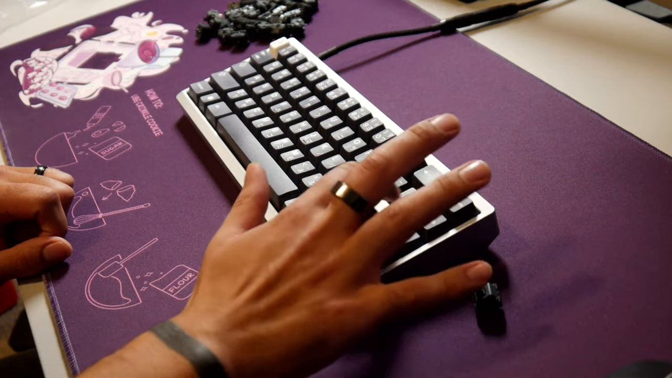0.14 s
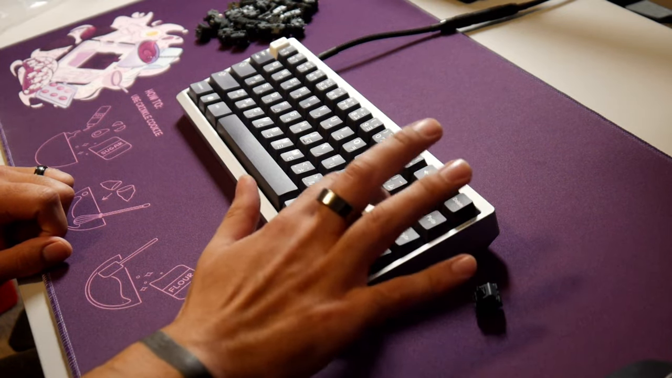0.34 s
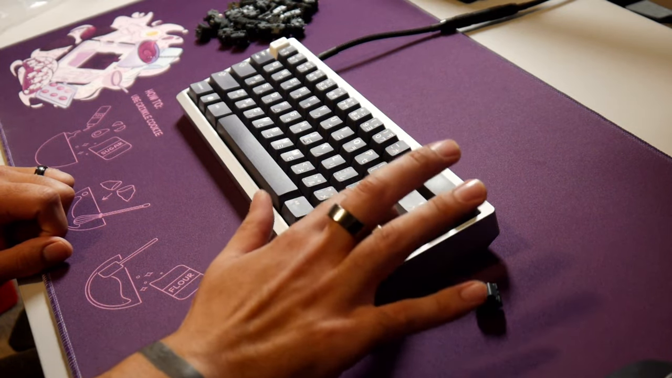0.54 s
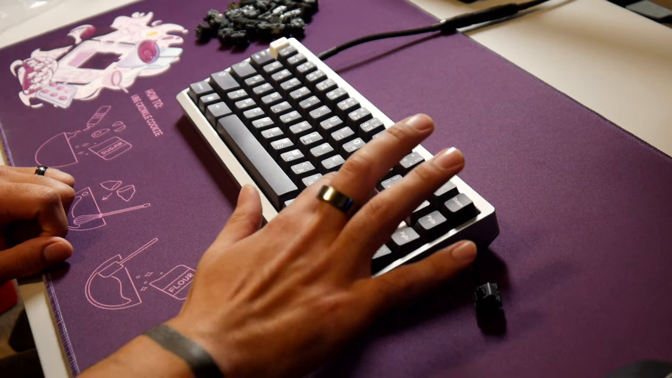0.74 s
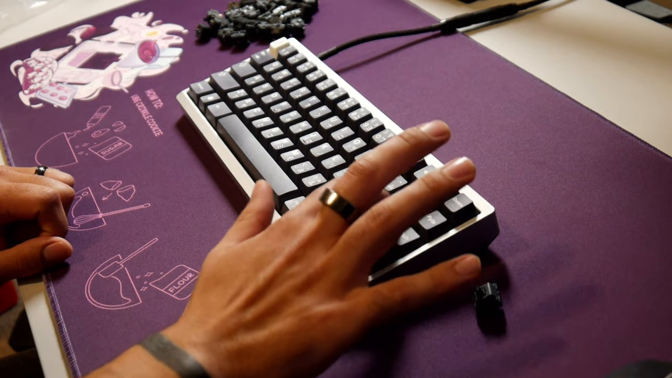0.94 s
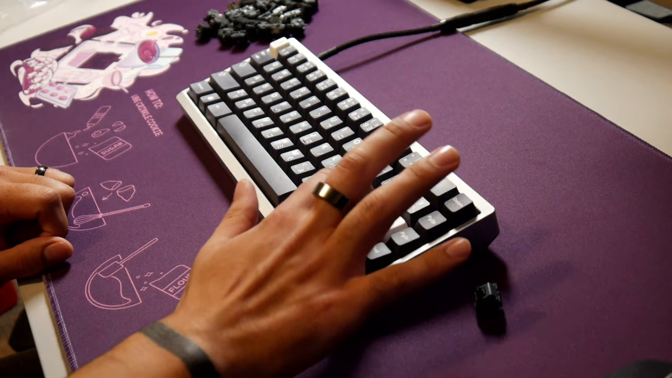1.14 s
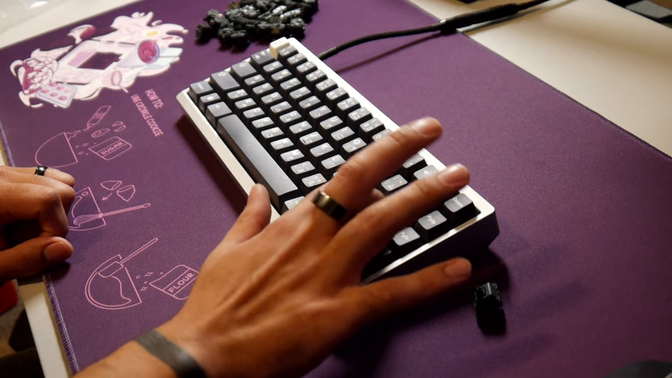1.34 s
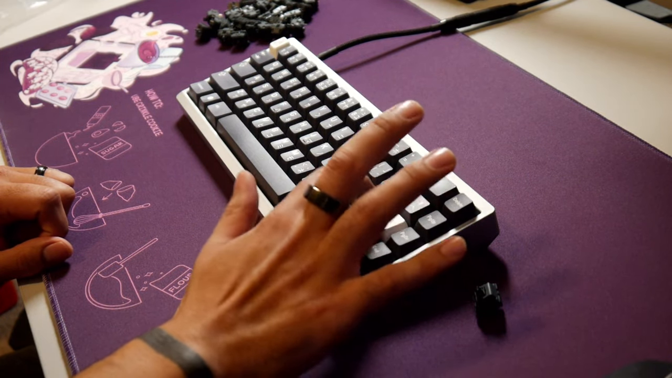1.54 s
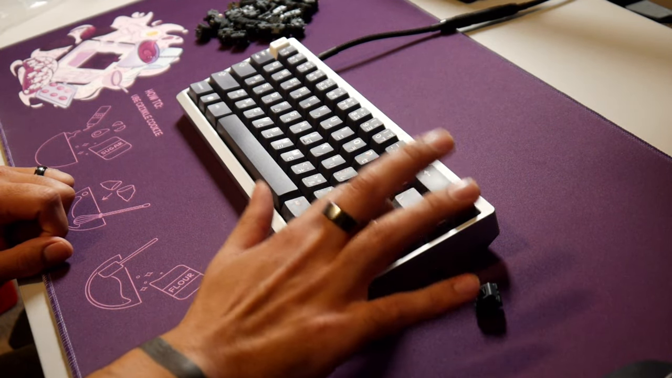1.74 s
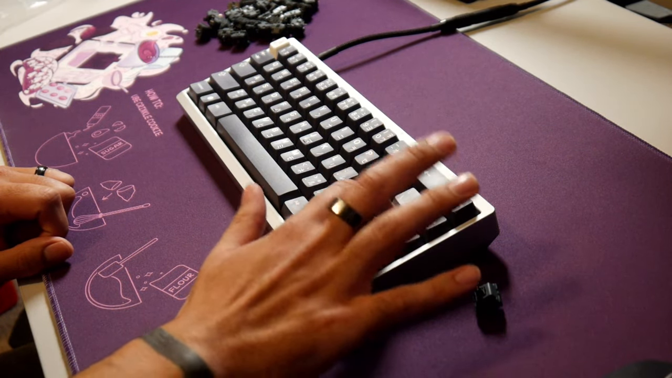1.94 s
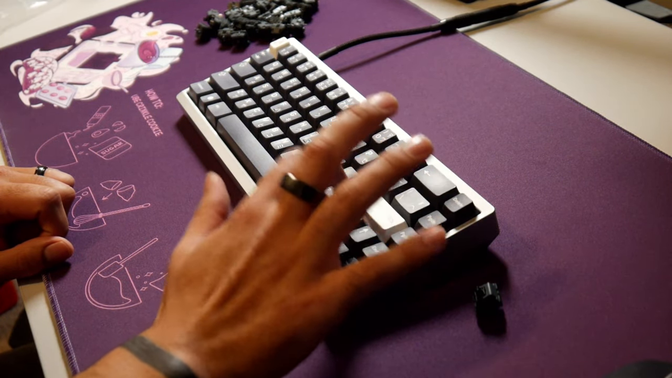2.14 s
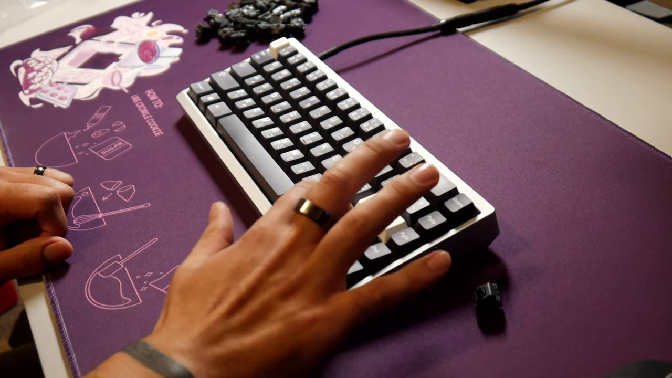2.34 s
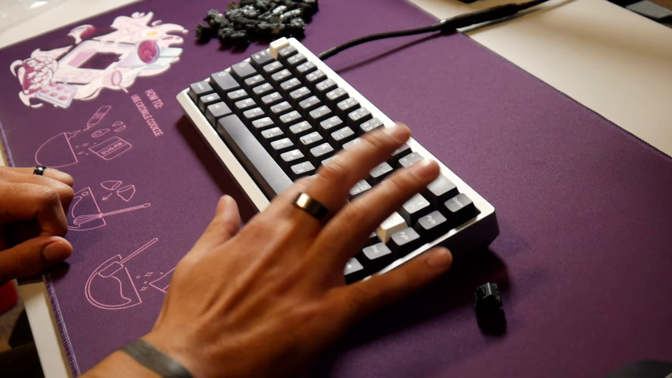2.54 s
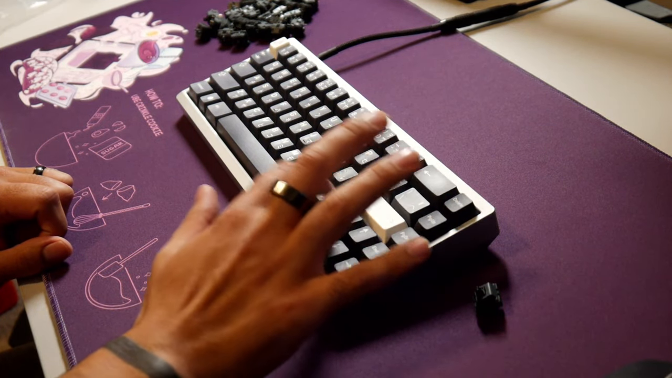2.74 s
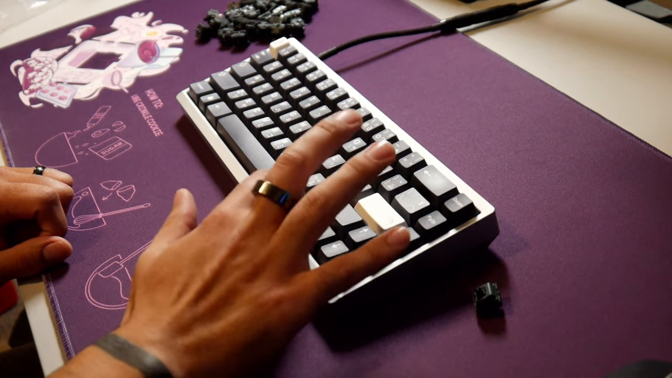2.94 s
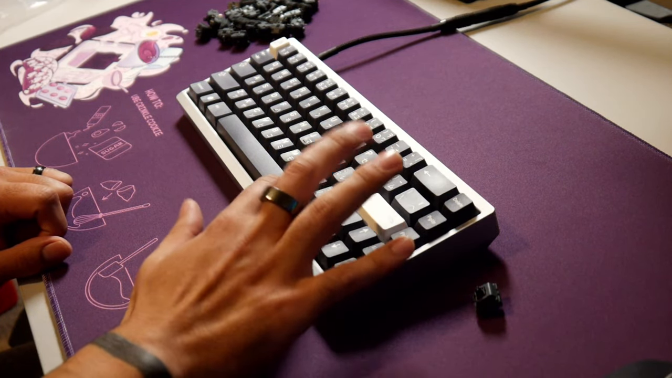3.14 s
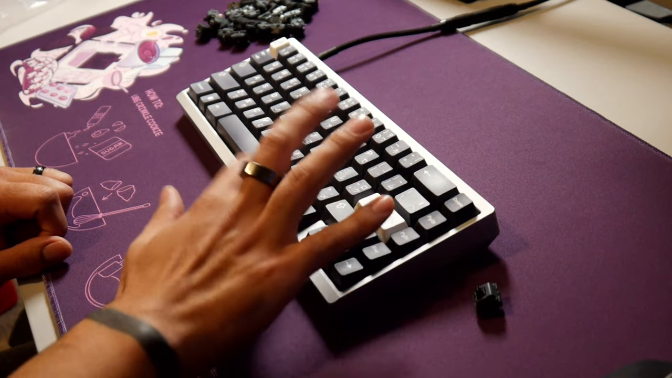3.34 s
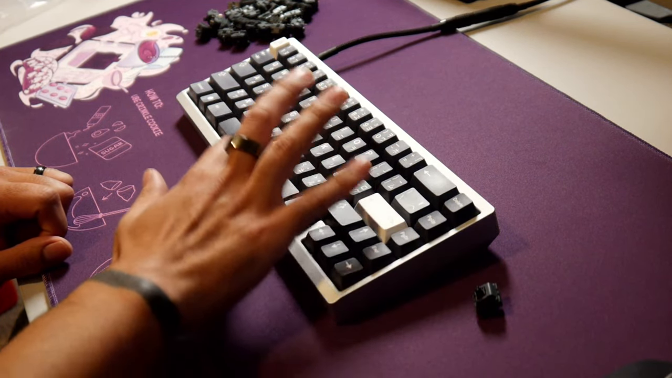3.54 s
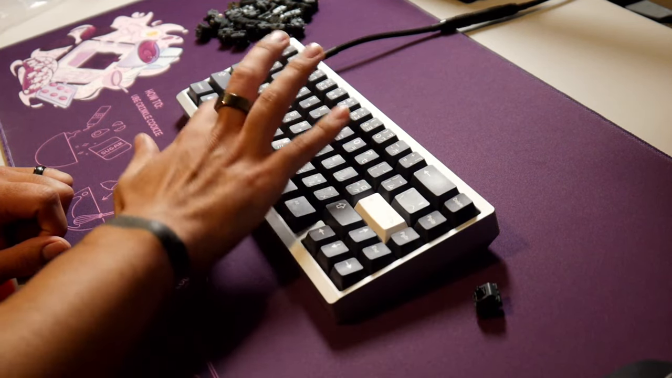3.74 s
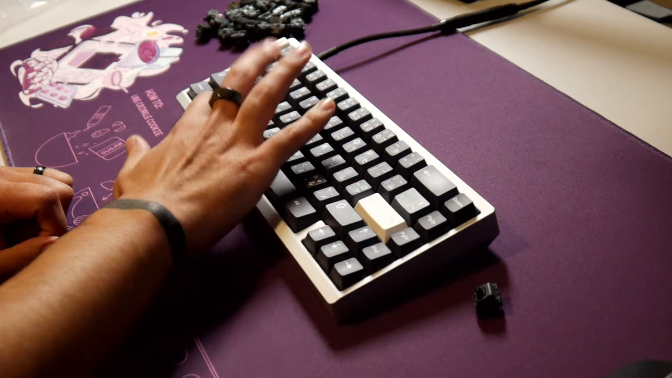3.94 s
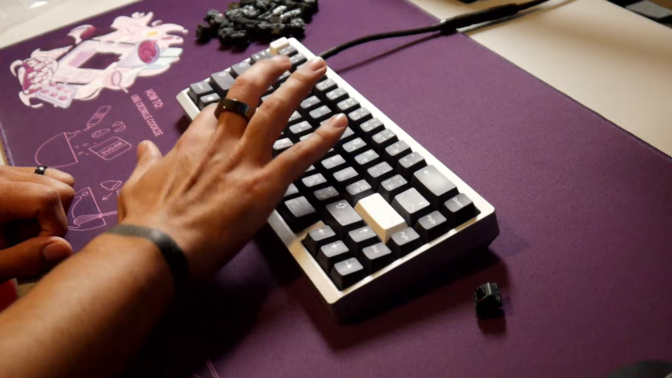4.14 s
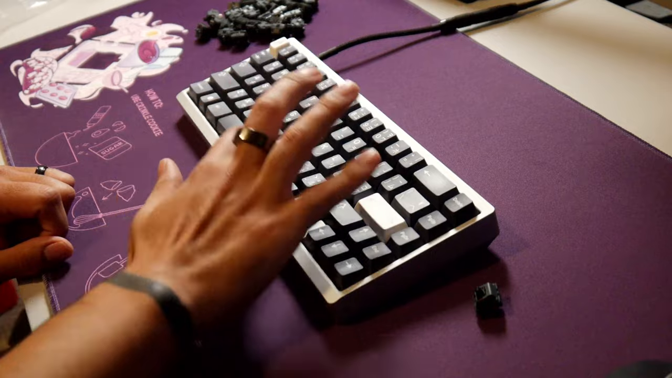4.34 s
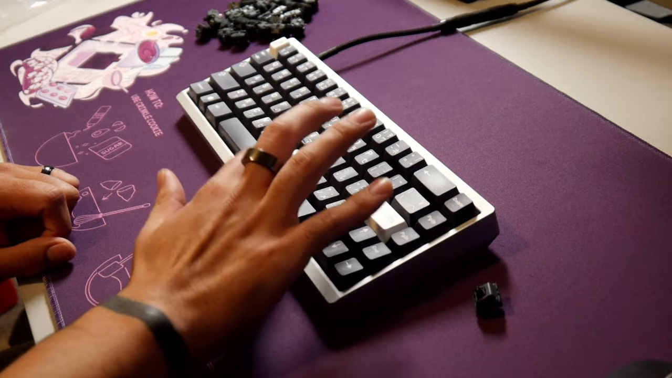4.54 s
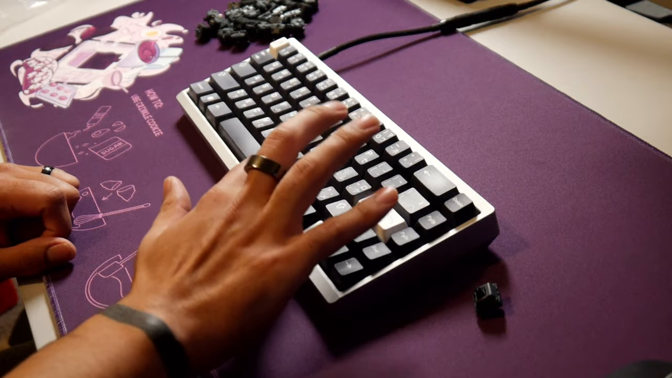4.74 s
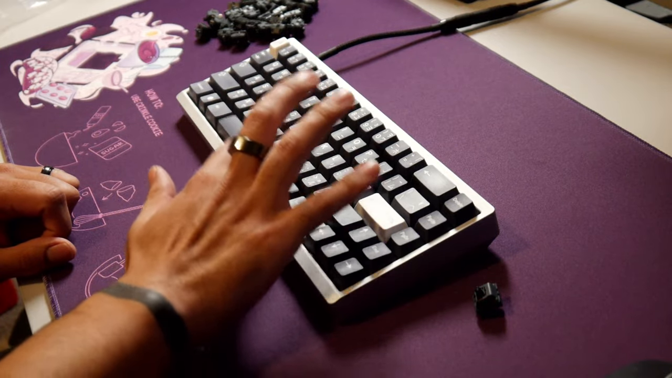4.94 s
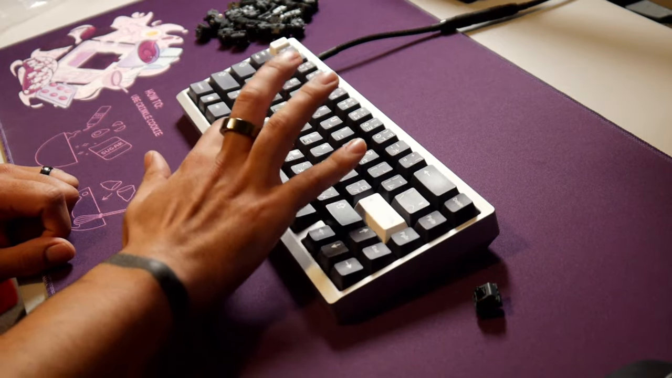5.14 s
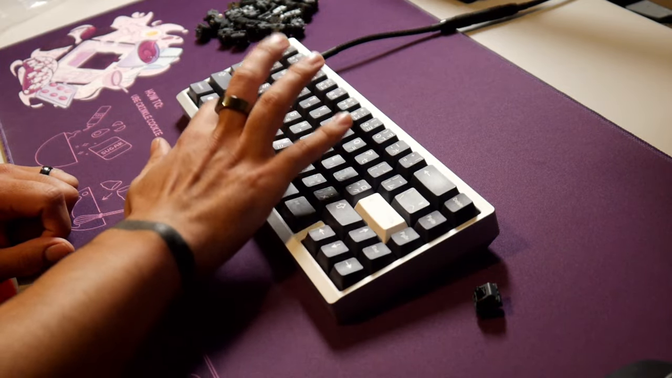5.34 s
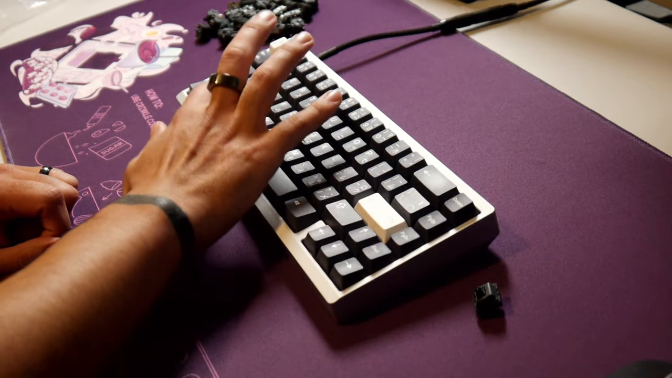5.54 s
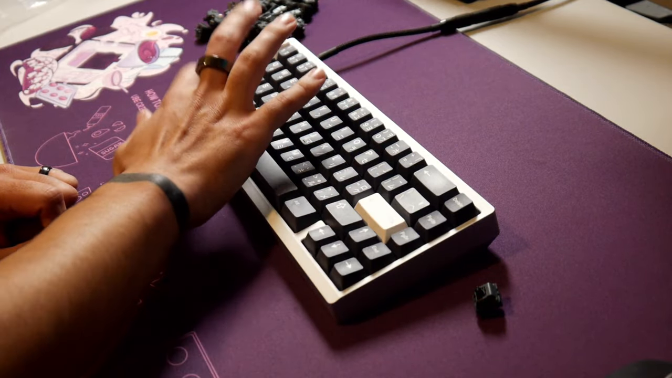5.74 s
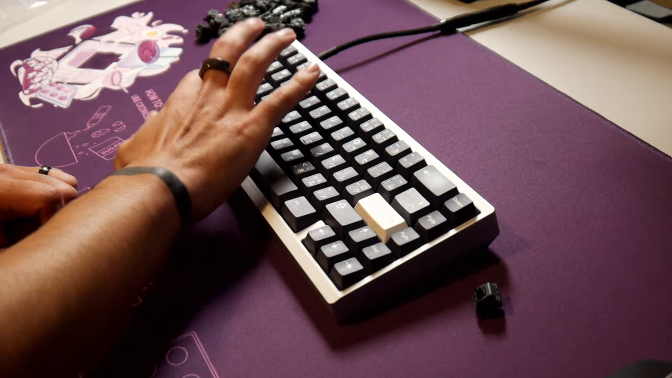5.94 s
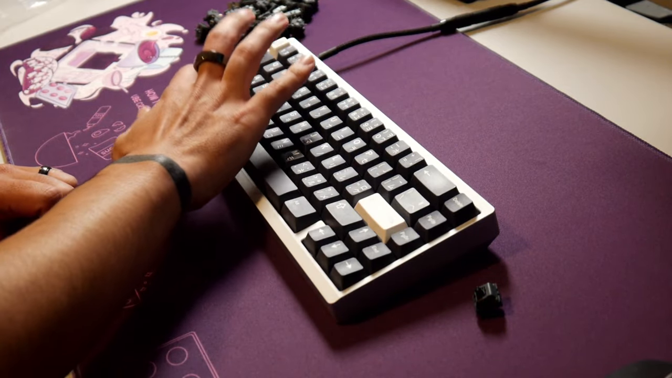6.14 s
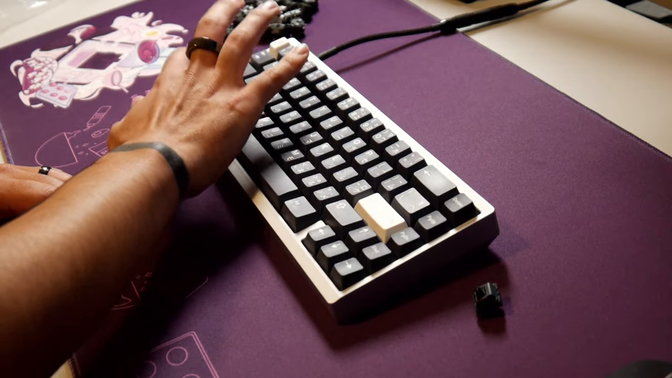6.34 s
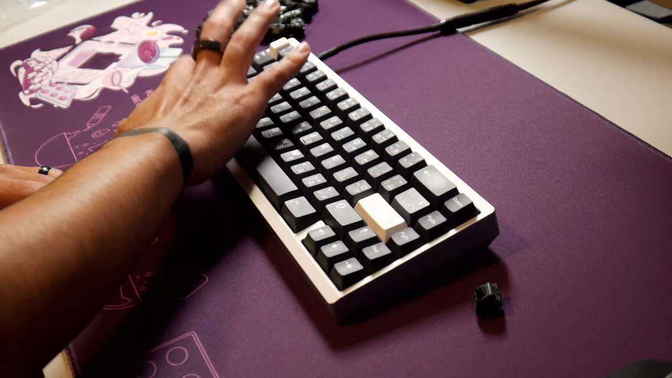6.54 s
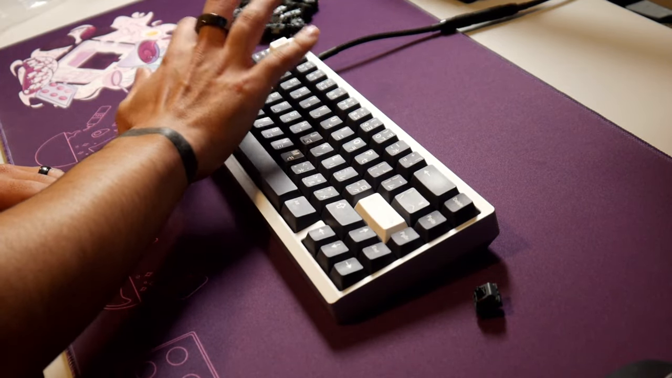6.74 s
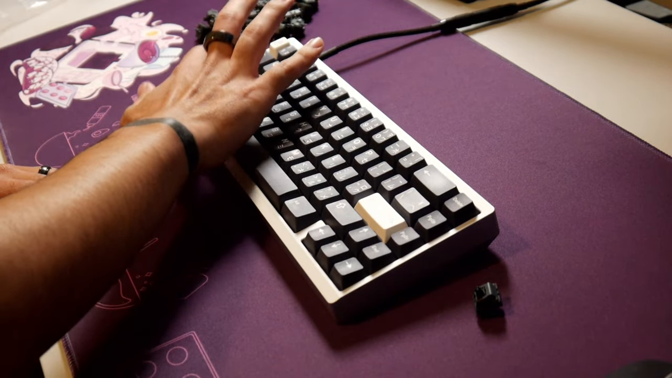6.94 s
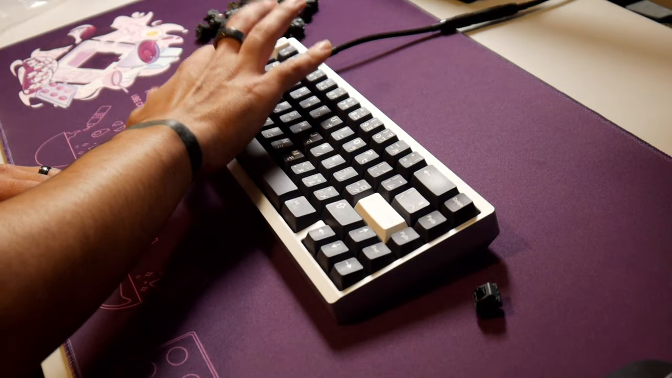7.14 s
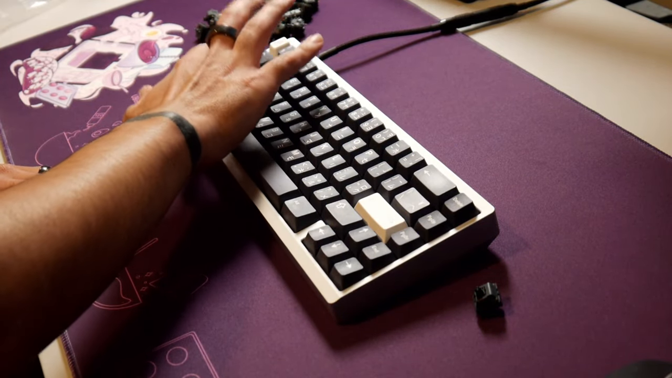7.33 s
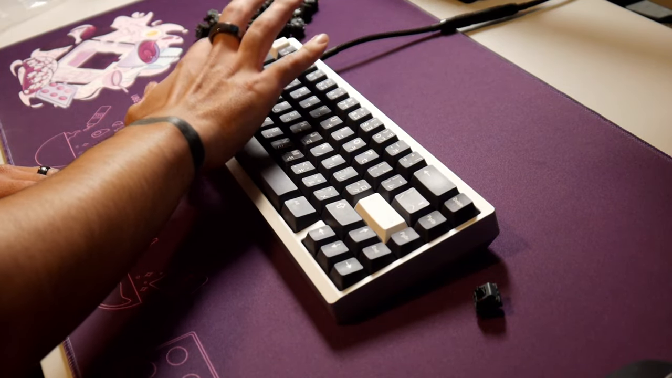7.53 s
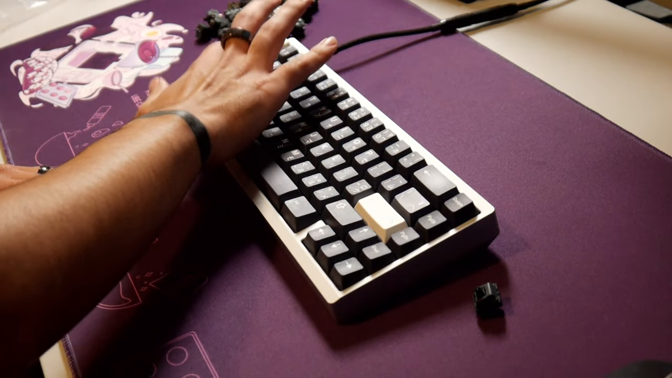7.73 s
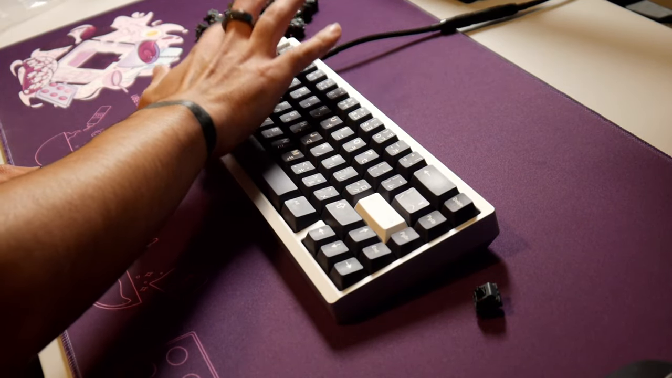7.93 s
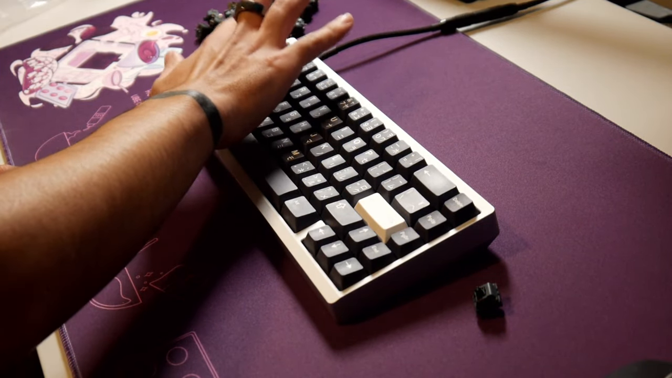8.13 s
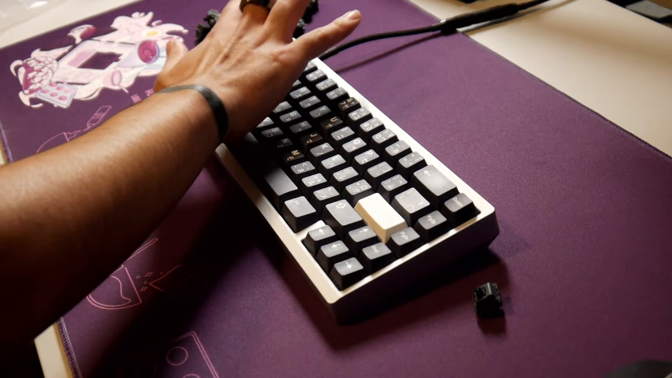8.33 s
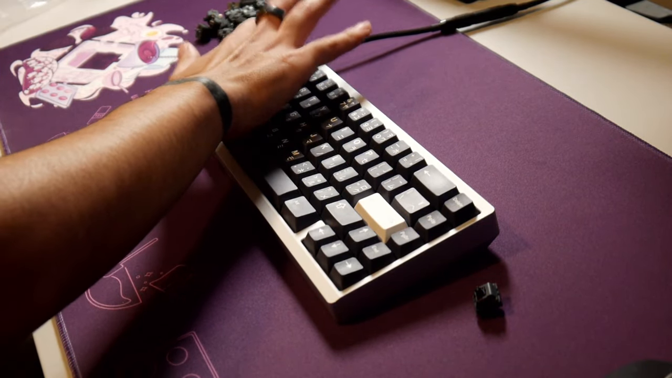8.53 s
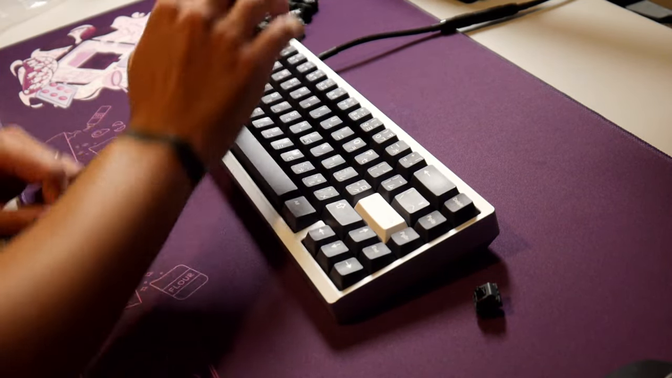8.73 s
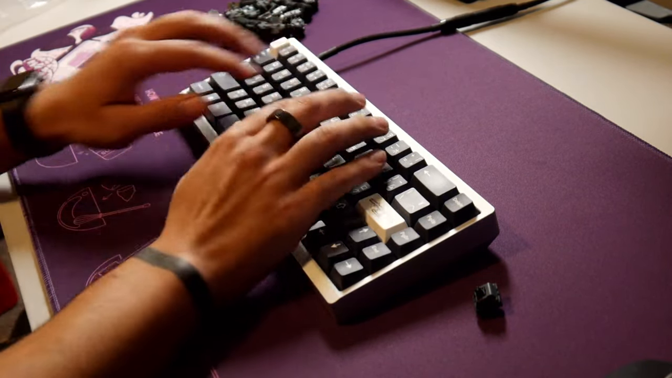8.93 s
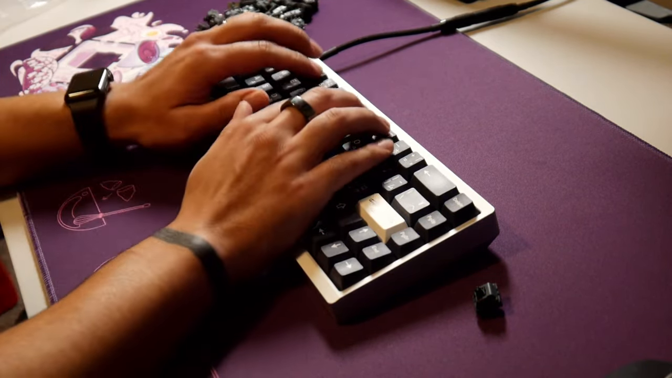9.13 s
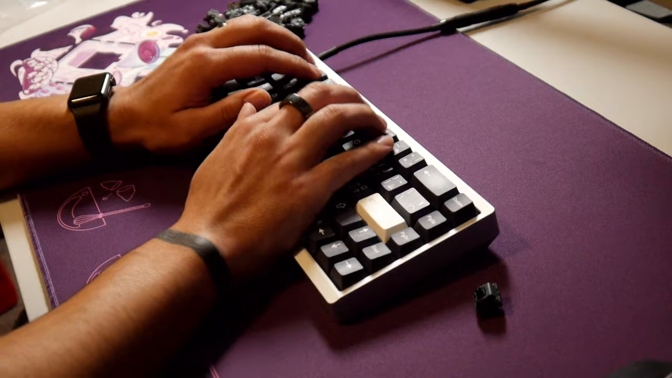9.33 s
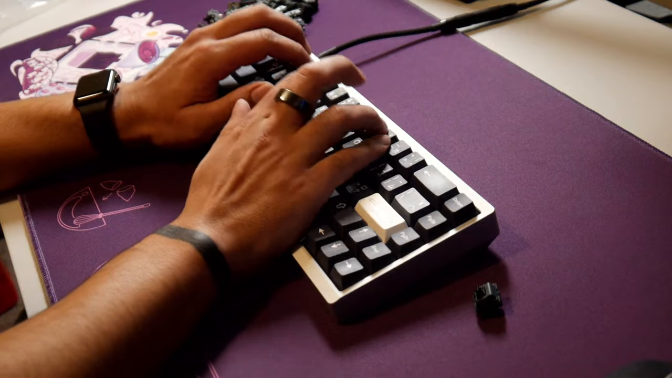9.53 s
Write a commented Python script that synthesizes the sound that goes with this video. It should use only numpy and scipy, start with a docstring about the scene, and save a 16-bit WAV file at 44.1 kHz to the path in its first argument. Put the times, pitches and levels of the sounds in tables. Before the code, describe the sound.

Crisp, bright key clacks at a regular six or seven a second, each with a lighter release click, close up in a small quiet room.

```python
"""Typing on a metal-cased keyboard

One hand taps single keys of a keyboard on a desk mat, moving from its right end to its left.
Each press and release is a brief blow that rings the modes of plate and case, thuds in the desk and
echoes in a small room. Fingertips brush the caps now and then, as noise in one resonance.
Beneath lie a faint narrow hum, a thin higher tone and room air; the sound falls silent three times.
"""
import sys
import numpy as np
from scipy import signal
from scipy.fft import rfft, irfft, next_fast_len
from scipy.io import wavfile
from scipy.ndimage import uniform_filter1d, map_coordinates

SR = 44100
rng = np.random.default_rng(int(sys.argv[2]) if len(sys.argv) > 2 else 0)


def transcribe(u):
    """Save the signal u as a 16-bit wav file named by the first command-line argument.

    u: samples, shape (n,) or (channels, n), limited to [-1, 1]; the rate is SR.
    q: integer samples, one column per channel.
    """
    v = np.clip(np.atleast_2d(u).T, -1, 1)
    q = np.round(v * 32767).astype(np.int16)
    wavfile.write(sys.argv[1], SR, q)


N = 426888

# Keys bottoming out. Each row: blow in seconds, clack level in dB over 4 ms, nominal desk thud in dB.
PRESSES = [(-0.04, -32.5, -53), (0.2138, -32, -54.5), (0.375, -36.5, -58.5), (0.5145, -34.5, -59),
           (0.746, -51.5, -69), (0.846, -51.5, -78), (0.972, -38.5, -63.5), (1.1341, -43, -65.5),
           (1.287, -50, -80), (1.411, -39, -57.5), (1.5626, -33, -57.5), (1.7107, -31.5, -52.5),
           (1.8597, -30.5, -53.5), (2.155, -25, -47.5), (2.2938, -33.5, -54.5), (2.4478, -31, -54.5),
           (2.5932, -30.5, -54.5), (2.8214, -19.5, -47.5), (2.9593, -27.5, -60), (3.1058, -27, -54),
           (3.3254, -16, -44), (3.4657, -24.5, -46.5), (3.6052, -22.5, -44), (3.754, -23.5, -51.5),
           (3.9005, -19.5, -48.5), (4.0637, -22.5, -50), (4.2126, -24, -50), (4.3647, -27, -49),
           (4.5132, -24.5, -52), (4.665, -24, -52), (4.8337, -26, -50.5), (4.9738, -25, -49),
           (5.1126, -25, -46), (5.2719, -27.5, -50), (5.3966, -25, -53.5), (5.5221, -29, -58),
           (5.7183, -24, -51), (5.853, -28.5, -54), (6.0392, -25, -41), (6.171, -29.5, -50),
           (6.3702, -21.5, -48), (6.503, -23, -50.5), (6.759, -20.5, -44.5), (6.9134, -32, -53),
           (7.0804, -27.5, -55), (7.2436, -23.5, -50), (7.3782, -28.5, -52.5), (7.649, -22, -49),
           (7.7818, -29, -54), (7.9713, -24, -53), (8.112, -29.5, -58), (8.3427, -24, -54),
           (8.4707, -29, -57), (9.584, -44.5, -83), (9.6498, -32, -70), (9.656, -24, -68),
           (9.661, -28.5, -63), (9.669, -52, -65)]
# Keys springing back against their stops.
# Each row: blow in seconds, clack level in dB over 4 ms, brightness in dB per octave.
RELEASES = [(0.032, -36, -1.5), (0.2976, -41.5, 1.5), (0.4493, -46, -3.5), (0.6145, -62, -7),
            (0.897, -58, -5), (1.0523, -50.5, -5), (1.207, -54.5, -4.5), (1.346, -53, -5),
            (1.49, -45, -0.7), (1.6409, -39.5, 1), (1.7884, -37, 0), (1.9443, -38, 1.5),
            (2.2317, -45.5, -7), (2.3786, -39, -0.2), (2.5276, -40, -1.5), (2.6709, -37.5, 2.5),
            (2.892, -41, -2), (3.0414, -35.5, -1), (3.1831, -35.5, 0), (3.4, -42, -5), (3.5406, -36, -4.5),
            (3.691, -43, -7), (3.8322, -29.5, -4), (3.9838, -34, -2), (4.128, -32.5, -1),
            (4.281, -37, -5.5), (4.4316, -42.5, -7), (4.5796, -41, -5.5), (4.7455, -36.5, -1.5),
            (4.9045, -39, -2.5), (5.0572, -39.5, -7.5), (5.197, -39, -3.5), (5.335, -46, -3.5),
            (5.4652, -44, -0.5), (5.5788, -37, -4.5), (5.7843, -30.5, 0), (5.9263, -32, -1.5),
            (6.1168, -41, -6.5), (6.2572, -39.5, -5.5), (6.4429, -30.5, 1), (6.588, -32, -4),
            (6.839, -32, -3.5), (6.9953, -36, -1.9), (7.1546, -36.5, -2), (7.312, -38.5, 3.5),
            (7.4661, -36.5, -1), (7.728, -35, -0.6), (7.8615, -32, -1), (8.042, -35.5, -2.5),
            (8.1968, -35, 1.5), (8.4091, -39, -2.5), (8.5408, -36.5, 0.5), (9.637, -49, 8)]
# Each entry: time in seconds at which the finger goes to other keys, the next of fifteen places.
MOVES = [.1, 2.1, 2.26, 2.75, 3.3, 5.55, 6.0, 6.33, 6.7, 7.04, 7.6, 7.93, 8.3, 9.2]
# Acoustics of each place, relative to the clack. Each row: room in dB, desk thud of a release in dB.
PLACES = [(-17, -23.5), (-16.5, -22), (-18, -14), (-19.5, -23.5), (-19, -30), (-19.5, -20), (-20.5, -37),
          (-17.5, -32.5), (-21.5, -42.5), (-20, -25.5), (-20.5, -23.5), (-18.5, -25), (-19, -28),
          (-16.5, -20.5), (-14, -25)]
# Modes of plate and case. Each row: centre in Hz, nominal width in Hz (narrowed in case_power),
# then fifteen columns of relative level in dB, one for a blow at each place.
CASE_MODES = [(838, 86, -47, -10, -40, -28.5, -18.5, -41.5, -14, -33, -21, -10.5, -11, -41, -18.5, -28, -28),
              (1065, 160, -27, -5.5, -11, -24.5, -25.5, -20, -17.5, -27.5, -10.5, -9.5, -8, -11, -16, -14, -11),
              (1286, 209, -0.5, -2.5, -5, -5, -7, 0, -4, -39, -3, -12.5, -19, -1, -5, -10.5, -3.5),
              (1481, 130, 3, 3.5, -2, 1.5, -11, 1, -5.5, -11, -9, -4, -2.5, 0, -5, -4, 0),
              (1745, 206, -3.5, -3, -10, -0.5, -8.5, -1, -2.5, -13, 4.5, 1.5, 5.5, 4, -4, -2.5, -8),
              (1990, 230, 10, -5, -2, -3.5, -2, 1.5, 0, -15, -1, 0, -6.5, -30, -13, 1.5, 4.5),
              (2255, 126, -0.5, 1.5, 2, -2, 1, -1.5, 4, 4, -8, 3, -2, 1, -14, 0, 1),
              (2623, 460, 3, -11.5, -2.5, -6, -9.5, -1, -8.5, -6, -2, -18, -12, -13.5, -12, -9.5, -3),
              (2970, 180, 0, 3, -7, -3, -15.5, -8.5, -5.5, -21, 1, -4, -9, 3.5, 3.5, -3, 6),
              (3170, 300, -3.5, 0, -3.5, -1, -8.5, -4, -10.5, -5, -13.5, -26, -44, -7.5, -2, -1.5, -2),
              (3537, 350, -5, -31, -1.5, 0, -6, -5, -2, -18, -14, -3, -3, 0.5, -5, -15.5, 2),
              (3852, 480, -13, -6.5, -11, -6, -12.5, -2.5, -15, -12, -2, -13, -10.5, -6.5, -11, -6.5, -3),
              (4323, 240, -39, -11.5, -10, -9.5, -9.5, -10, -8, -12, -8, -23.5, -32, -15.5, -14, -6, -2.5),
              (4830, 290, -42, -6.5, -19.5, -18.5, -15, -13.5, -11.5, -12.5, -23.5, -23, -19, -22, -9.5, -6, -3),
              (5265, 450, -18, -5.5, -15, -15, -22.5, -11.5, -13.5, -14, -23, 1.5, -2.5, -15, -11.5, -10.5, -9.5),
              (6176, 550, -13, -5, -11, -10.5, -14, -16.5, -16.5, -14, -17, -3, -4.5, -5, -9, -14.5, -14),
              (7023, 550, -6.5, -11, -14, -21, -13, -22, -13, -16.5, -10, -13, -12.5, -5, -15, -13, -14.5),
              (7740, 300, -21.5, -33, -16, -18.5, -11, -15.5, -11.5, -24, -13, -12, -19, -37, -12, -20, -9.5),
              (8480, 690, -14, -14.5, -19, -26, -18.5, -34, -17, -20, -17.5, -13.5, -13, -13, -21, -17.5, -16.5),
              (9500, 960, -17.5, -13.5, -25, -31.5, -28.5, -20, -20.5, -14.5, -27.5, -18.5, -20, -17, -19, -20, -17),
              (10480, 110, -26, -23, -14, -46, -18.5, -33, -22.5, -12.5, -20.5, -27, -15, -36, -36, -24, -17),
              (11450, 460, -51, -41.5, -19.5, -25.5, -27.5, -30.5, -32, -28, -27, -25.5, -28, -18.5, -31, -18, -18),
              (12240, 400, -48, -29.5, -31, -39, -27, -29, -24, -41, -21, -25.5, -33, -19.5, -23, -23.5, -20),
              (15400, 720, -40, -51, -35, -68, -33.5, -26.5, -44.5, -30.5, -37.5, -30, -30, -32, -39, -25, -26)]
# Modes of the desk. Each row: frequency in Hz, relative level in dB, 60 dB decay time in seconds.
DESK_MODES = [(48.5, -13, 0.17), (78.2, 4.5, 0.16), (117.5, 0, 0.17), (158.7, -4.5, 0.25),
              (205, -13.5, 0.16), (273, -21.5, 0.29), (442, -24.5, 0.32), (488, -28.5, 0.22)]
# How each place drives the desk, relative to 120 Hz.
# Each row: drive in dB at 48 Hz, at 78 Hz, at 158 Hz, from 280 Hz up.
DESK_COUPLING = [(-4, -2, -1, 11), (-4, 3.5, 1.5, -0.5), (0, 0, 1, -3.5), (-1.5, 0.5, -3, 6),
                 (3, 5, 0, 0.5), (-12.5, -3.5, -0.5, 8.5), (2, -4, 5.5, -6.5), (-3, -11, 0.5, -13.5),
                 (5, -9, 4.5, -3.5), (4.5, -13.5, -3.5, -8.5), (10, -3.5, -2, 3.5), (9, -1, -5, 4),
                 (13, 2, 3, 0), (13, 1.5, 10, 7.5), (11, 6, 2, 16)]
# Early echoes from the walls. Each row: delay in seconds, relative level in dB.
WALL_ECHOES = [(.0083, -19), (.0097, -18.5), (0.0136, -26.5), (0.0222, -18), (.0222, -36), (0.0379, -43)]
# Reverberation of the room. Each row: frequency in Hz, 60 dB decay time in seconds.
ROOM_DECAY = [(500, 0.4), (1500, 0.24), (4000, 0.21), (7000, 0.22), (11000, 0.26), (15000, 0.14)]
# Colour of the reverberation. Each row: frequency in Hz, relative level in dB.
ROOM_COLOUR = [(400, 8), (1200, -5.5), (2000, 0), (3200, -4.5), (4600, -3), (6000, -7), (7700, 0.5),
               (10000, -8), (15000, 4)]
# Response of the microphone to the clacks. Each row: frequency in Hz, gain in dB.
MIC_RESPONSE = [(400, -21.5), (750, -1), (13400, 2), (13950, -4), (14250, -18.5), (14550, -8), (15500, -1),
                (16200, -16)]
# Fingertips brushing the caps.
# Each row: start in seconds, length in seconds, nominal level in dB, centre in Hz, width in Hz.
RUBS = [(0.64, 0.075, -85, 3100, 300), (0.59, 0.17, -79, 1470, 370), (8.653, 0.068, -76, 1230, 440),
        (9.559, 0.033, -61, 3000, 2400)]
# Slow course of the hum. Each row: time in seconds, level in dB before its random waver.
HUM_LEVEL = [(0.0, -83.5), (0.42, -63), (0.54, -90), (0.76, -69.5), (0.96, -116), (1.06, -76),
             (2.47, -73.5), (2.72, -93.5), (2.79, -66.5), (5.27, -64.5), (6.11, -92), (6.33, -63),
             (6.8, -86), (6.87, -71), (7.71, -87), (7.74, -73.5), (8.88, -77.5), (9.6, -72.5)]
# Spectrum of the room air. Each row: frequency in Hz, relative density in dB per Hz.
AIR_SPECTRUM = [(25, -16), (100, 4), (300, 5), (600, -4), (1200, -3), (3000, -16.5), (8000, -26.5),
                (16000, -53.5)]
# Silent gaps. Each row: start in seconds, end in seconds.
SILENCES = [(.905, 0.98), (1.354, 1.4155), (8.903, 9.567)]

SIZE = 2 ** 15  # transform length in samples; a contact lasts half of it
LEAD = round(0.0055 * SR)  # samples of faint noise before the blow
PRESS_BRIGHT_DB = 0.85  # dB per octave
# pairs: (press, release)
LEAD_NOISE_DB = (-44.5, -38.5)  # faint noise rising just before the blow: its nominal final level
RATTLE_DB = (-14.5, -10)  # rattle under the blow
SCATTER_DB = (1.5, 3)  # spread of the mode levels from blow to blow
RELEASE_ROOM_DB = 2.7  # a release sounds a little more distant than a press
SOFT_ROOM_DB, USUAL_DB = -0.01, -30  # room change per dB that a contact lies under the usual level
DIFFUSE_HZ = 222  # the room gathers sound from all sides of the case: its modes blur over this width
WAVER_DB = 3  # scale of the hum's slower random swing
WHINE_DB, WHINE_FOLLOWS = -88.5, 0.69  # central level of the thin tone, and its dB per dB of hum
AIR_DB, AIR_FOLLOWS = -79.5, 0.45  # central level of the room air, and its dB per dB of hum
PASS_FOLLOWS, PASS_S = 0.15, 0.12  # air's dB per dB of keys, averaging time in s
TOP_HZ = 16700  # band limit


def amp(db):
    """A level in dB is twenty times the logarithm of the gain returned."""
    return 10 ** (np.asarray(db) / 20)


def unit(x):
    """Division by the root mean square normalizes x to rms 1."""
    return x / np.sqrt(np.mean(x ** 2) + 1e-20)


def along(points, hz):
    """Linear interpolation of (Hz, value) points on a logarithmic frequency axis."""
    f, v = np.transpose(points)
    return np.interp(np.log(hz + 1), np.log(f + 1), v)


def curve(rows):
    """Linear interpolation in time: one value per sample from (s, value) rows."""
    return np.interp(np.arange(N) / SR, *np.transpose(rows))


def causal(gain):
    """Minimum phase: folding the cepstrum gives the causal response that has this gain."""
    cepstrum = irfft(np.log(gain + 1e-6))
    half = len(cepstrum) // 2
    cepstrum[1:half] *= 2
    cepstrum[half + 1:] = 0
    return np.exp(rfft(cepstrum))


def shaped(gain):
    """Filtered noise: white noise takes the given gain over frequency, at rms 1."""
    m = next_fast_len(N)
    spectrum = rfft(rng.standard_normal(m)) * gain(np.fft.rfftfreq(m, 1 / SR))
    return unit(irfft(spectrum, m)[:N])


def wobble(rate):
    """Band-limited fluctuation: a smooth random curve with rate knots a second."""
    knots = rng.standard_normal(int(N * rate / SR) + 4)
    return map_coordinates(knots, [np.arange(N) * rate / SR])


def keyboard():
    """Superposition of all contacts, each with the colour and room of its place on the board."""
    out = np.zeros(N + 2 * SIZE)
    contacts = [(s, db, PRESS_BRIGHT_DB, thud_db, False) for s, db, thud_db in PRESSES]
    for s, db, bright_db in RELEASES:
        thud_db = db + PLACES[np.searchsorted(MOVES, s)][-1]
        contacts.append((s, db, bright_db, thud_db, True))
    for s, db, bright_db, thud_db, released in sorted(contacts):
        place, at = np.searchsorted(MOVES, s), SIZE + round(s * SR)
        room_db = PLACES[place][0] + RELEASE_ROOM_DB * released + SOFT_ROOM_DB * (USUAL_DB - db)
        sound = clack(place, bright_db, room_db, released)
        out[at - LEAD:][:len(sound)] += amp(db) * sound
        out[at:][:SIZE // 2] += amp(thud_db) * thud(place)
    return out[SIZE:SIZE + N]


def clack(place, bright_db, room_db, released):
    """Source and filter: the blow and its echoes excite the case modes, then the room reverberates."""
    hz = np.fft.rfftfreq(SIZE, 1 / SR)
    power = case_power(hz, place, released)
    tilt = amp(bright_db * np.log2(np.clip(hz, 1200, 12000) / 2300))  # a softer contact is duller
    mic = amp(along(MIC_RESPONSE, hz))
    body = causal(np.sqrt(power) * tilt * mic)
    blurred_power = np.abs(uniform_filter1d(power, round(DIFFUSE_HZ * SIZE / SR)))
    diffuse_body = causal(np.sqrt(blurred_power) * tilt * mic)

    blow = strike(released)
    add_echoes(blow, room_db)
    tail = np.pad(amp(room_db - 15.5) * reverb()[:-LEAD], (LEAD, 0))
    spectrum = rfft(blow, SIZE) * body + rfft(tail, SIZE) * diffuse_body
    sound = irfft(spectrum)[:SIZE // 2]
    first_4_ms = sound[LEAD:LEAD + round(0.004 * SR)]
    return sound / np.sqrt(np.mean(first_4_ms ** 2))


def case_power(hz, place, released):
    """Modal superposition: resonance peaks of plate and case, weighted by where the blow falls."""
    power = 0
    for centre, width, *levels_db in CASE_MODES:
        level_db = levels_db[place] + rng.normal(0, SCATTER_DB[released])
        offset = (hz - centre * rng.normal(1, 0.015)) / (0.64 * width)
        power = power + amp(level_db) ** 2 / (1 + offset ** 2) ** 1.99
    return power


def strike(released):
    """Noise, then impact: a short hiss leads into the blow, then cap and spring rattle."""
    t = np.arange(SIZE // 2) / SR
    blow = np.zeros(SIZE // 2)
    lead_db = LEAD_NOISE_DB[released] + 1500 * (t[:LEAD] - t[LEAD]) + rng.normal(0, 2)  # 1500 dB/s rise
    blow[:LEAD] = amp(lead_db) * rng.standard_normal(LEAD)
    blow[LEAD:LEAD + 3] = 0.55, 0.35, 0.15  # the contact lasts a moment, which softens its treble
    chatter = signal.lfilter([1, -0.6], 1, rng.standard_normal(len(t) - LEAD))  # bright noise
    blow[LEAD:] += amp(RATTLE_DB[released] - 60 * t[:-LEAD] / 0.011) * chatter
    return blow


def add_echoes(blow, room_db):
    """Early reflection: delayed bursts join the blow, smeared by uneven surfaces."""
    fade = amp(-60 * np.arange(90) / SR / 0.0044)
    for delay, db in WALL_ECHOES:
        scatter = fade * rng.standard_normal(90)
        blow[LEAD + round(delay * SR):][:90] += amp(db + room_db + 2) * scatter


def reverb():
    """Diffuse reverberation: a fresh noise tail in which each frequency dies at its own speed."""
    hz, t, z = signal.stft(rng.standard_normal(SIZE // 2), SR, nperseg=256)
    fade_db = along(ROOM_COLOUR, hz)[:, None] - 60 * t / along(ROOM_DECAY, hz)[:, None]
    tail = signal.istft(z * amp(fade_db), SR, nperseg=256)[1][:SIZE // 2]
    build_up = 1 - np.exp(-(np.arange(SIZE // 2) / SR / 0.0007) ** 2)  # as the first walls answer
    return tail * build_up


def thud(place):
    """Damped modes of the desk: the mat cushions the blow, so they swell before they die."""
    t = np.arange(SIZE // 2) / SR
    low, boom, knock, ring = DESK_COUPLING[place]
    drive = [(48, low), (78, boom), (120, 0), (158, knock), (280, ring)]
    sound = 0
    for hz, db, t60 in DESK_MODES:
        level_db = db + along(drive, hz) + rng.normal(0, 4.3)
        phase = 2 * np.pi * hz * rng.normal(1, 0.015) * t + rng.normal(0, 1.0)
        sound = sound + amp(level_db - 60 * t / t60) * np.cos(phase)
    swell = np.sin(np.pi / 2 * np.minimum(t / 0.012, 1)) ** 2
    return 1.11 * sound * swell


def rubs():
    """Sliding friction: soft, uneven noise in one resonance of the caps."""
    t, out = np.arange(N) / SR, 0
    for s, length, db, centre_hz, width_hz in RUBS:
        stroke = np.sin(np.pi * np.clip((t - s) / length, 0, 1)) ** 0.57 * (t < s + length)
        friction = shaped(lambda hz: 1 / (1 + ((hz - centre_hz) / width_hz * 2) ** 2))
        out = out + amp(db + 2.9 * wobble(60)) * stroke * friction
    return out


def hum(slow_db):
    """Narrow-band noise: a resonance curve about 365 Hz, wavering at random around its slow course."""
    tone = shaped(lambda hz: 1 / (1 + ((hz - 365) / 26) ** 2))
    return amp(slow_db + WAVER_DB * wobble(10) + 2.3 * wobble(18)) * tone


def whine(swell_db):
    """Narrow-band noise: a thinner resonance about 599 Hz partly follows the swell of the hum."""
    tone = shaped(lambda hz: 1 / (1 + ((hz - 599) / 11) ** 2))
    return amp(WHINE_DB + WHINE_FOLLOWS * swell_db + 5 * wobble(3)) * tone


def room_air(swell_db, keys):
    """Broadband noise with gain control: a noise suppressor lets the air through while keys sound."""
    keys_power = np.abs(uniform_filter1d(keys ** 2, round(PASS_S * SR)))
    keys_db = 10 * np.log10(keys_power + 1e-9)
    pass_db = PASS_FOLLOWS * (keys_db - np.median(keys_db))
    air = shaped(lambda hz: amp(along(AIR_SPECTRUM, hz)))
    return amp(AIR_DB + AIR_FOLLOWS * swell_db + pass_db + 2.5 * wobble(4)) * air


def background(keys):
    """Addition of independent noises: hum, whine and air share one slow swell."""
    slow_db = curve(HUM_LEVEL)
    swell_db = slow_db - slow_db.mean()
    return hum(slow_db) + whine(swell_db) + room_air(swell_db, keys)


def scene():
    """Linear superposition of keyboard, fingertips and background in one channel."""
    keys = keyboard()
    return (keys + rubs() + background(keys))[None]


def record(dry):
    """Gating and band limiting: silent gaps with short fades, rolled-off bass, nothing above TOP_HZ."""
    t, gain = np.arange(N) / SR, 1
    for start, end in SILENCES:
        gain = gain * np.clip(np.maximum((start - t) / 0.032, (t - end) / 0.0043), 0, 1)  # fades in s
    m = next_fast_len(N + SR // 2)
    hz = np.fft.rfftfreq(m, 1 / SR)
    bass_rolloff = (1j * hz / (1j * hz + 30)) ** 2  # the microphone rolls off the deepest bass
    band = bass_rolloff * (hz < TOP_HZ)
    return irfft(rfft(dry * gain, m) * band, m)[:, :N]


dry = scene()
out = record(dry)
transcribe(out)
```